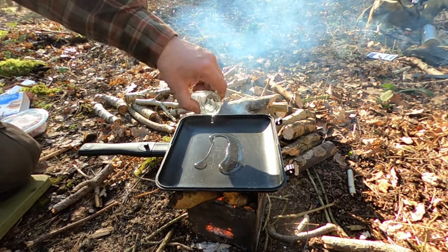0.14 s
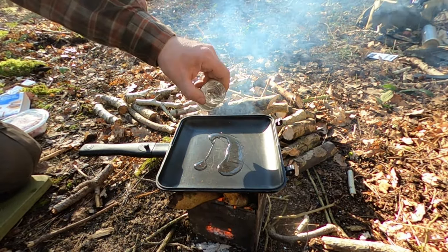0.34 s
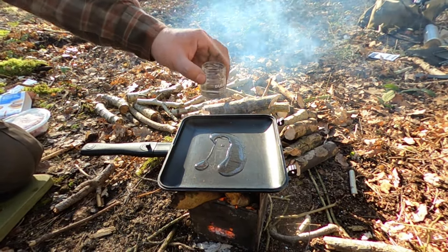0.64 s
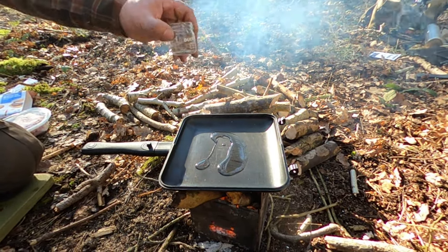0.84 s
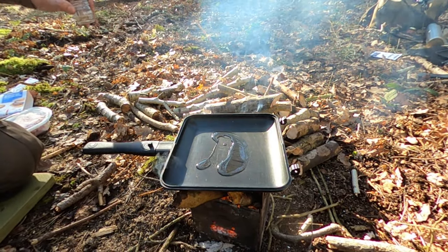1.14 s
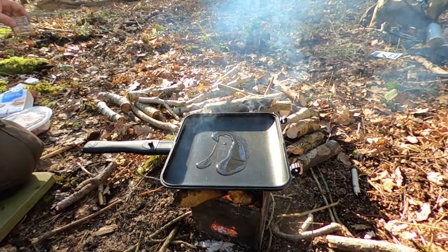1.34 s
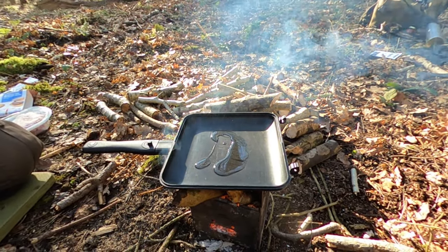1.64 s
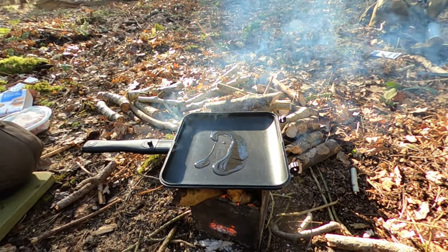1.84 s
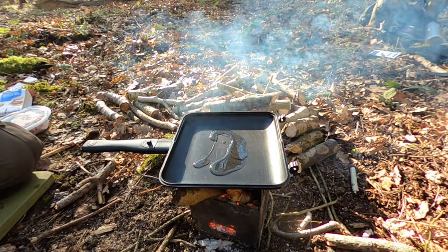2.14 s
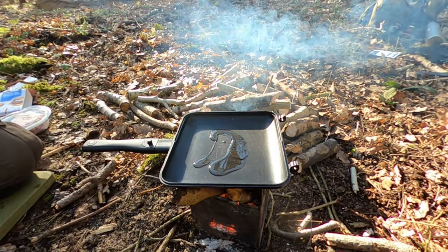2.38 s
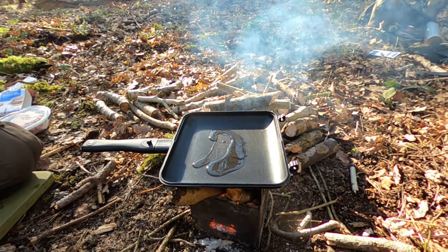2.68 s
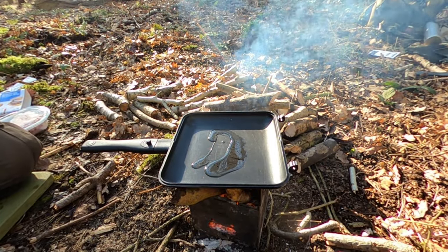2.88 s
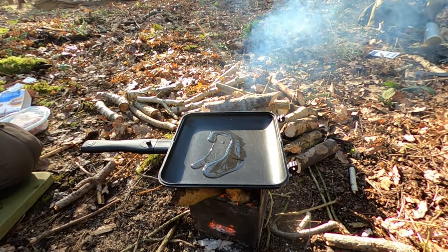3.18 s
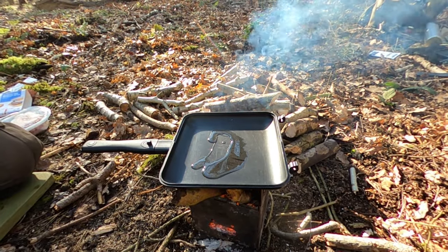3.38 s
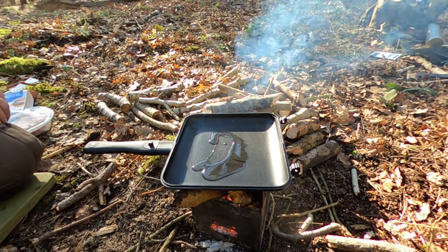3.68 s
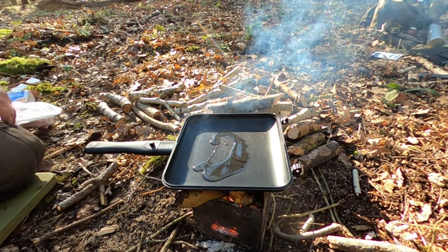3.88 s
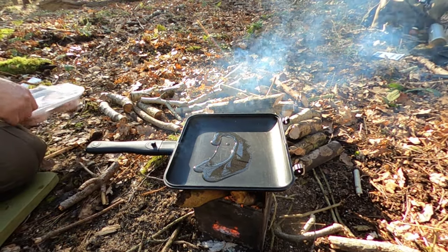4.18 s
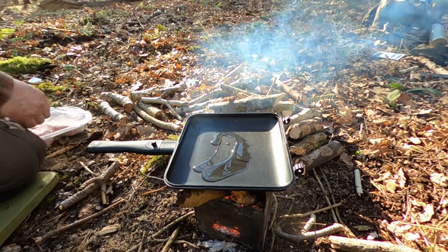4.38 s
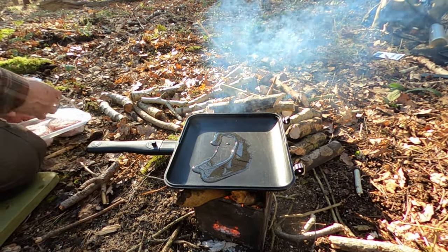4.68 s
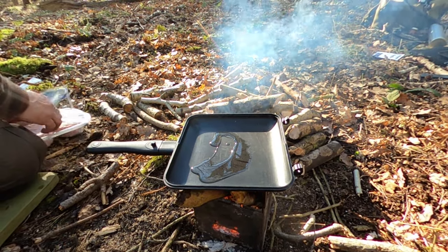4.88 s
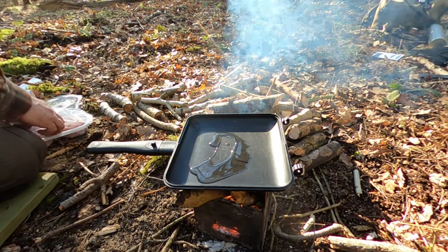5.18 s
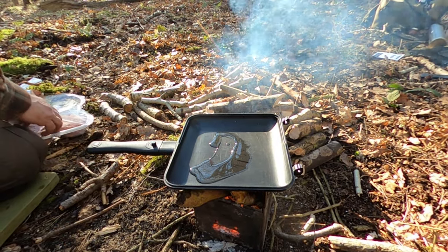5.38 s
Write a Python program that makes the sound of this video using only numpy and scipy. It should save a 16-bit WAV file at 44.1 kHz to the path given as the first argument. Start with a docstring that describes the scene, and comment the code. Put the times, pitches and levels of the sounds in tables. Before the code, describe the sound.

Outdoors in quiet woods, small birds chirp, whistle and warble with a soft forest echo. A wood fire's hiss swells gently with a few tiny pops, then fades. Later a hand rustles plastic wrapping over a tub, crinkling and snapping near the microphone, with a short hollow knock partway. Light wind rumbles low on the microphone, and a faint distant drone lies behind.

```python
"""Plastic wrapping is rustled over a food tub: creases and larger folds buckle, and its walls resonate.
The tub also knocks, as a cluster of contacts excites its decaying modes.
Small birds whistle in gliding, warbling tones, scattered by branches and by the far forest.
Behind them a wood fire hisses and pops as filtered noise, a breeze rumbles as low turbulent noise on
the microphone, dull thumps come through the ground, and a far drone and still air fill the background."""
import sys
import numpy as np
from scipy import signal
from scipy.fft import rfft, irfft
from scipy.io import wavfile
from scipy.ndimage import uniform_filter1d

SR = 44100
rng = np.random.default_rng(int(sys.argv[2]) if len(sys.argv) > 2 else 0)


def bounce(signal):
    """Save signal as a 16-bit WAV file at the path given by the first command-line argument."""
    frames = np.transpose(np.atleast_2d(signal))
    limited = np.clip(frames, -1, 1)
    pcm = np.round(limited * 32767).astype(np.int16)
    wavfile.write(sys.argv[1], SR, pcm)


N = 243431
TIME = np.arange(N) / SR  # s

# relative spectral density of creasing plastic: frequency_hz, density_db
PLASTIC = [(100, 6.5), (260, -1), (520, -6), (850, -1.5), (1100, -6), (1500, 1), (2200, -3.5), (3100, -1),
           (4400, -4), (6500, -10.5), (8200, -17), (10000, -25.5), (12500, -26.5), (16000, -34.5)]
# how hard the hand works the wrapping: time_s, relative_level_db
HANDLING = [(3.45, -77.5), (3.6, -68), (3.73, -64.5), (3.8, -66), (3.94, -76), (4.12, -68.5), (4.27, -66.5),
            (4.45, -61), (4.76, -58.5), (4.92, -60.5), (5.23, -78.5), (5.39, -76), (5.52, -85)]


def gain_of(db):
    """Level to amplitude: 20 dB is a factor of ten."""
    return 10 ** (np.asarray(db) / 20)


def evened(x):
    """Normalization of the mean power: scales to rms 1."""
    return x / np.sqrt(np.mean(x ** 2) + 1e-30)


def read(points, hz):
    """Spectral envelope: interpolates decibels on a log-frequency axis."""
    f, value = np.transpose(points)
    return np.interp(np.log(hz + 1), np.log(f), value)


def follow(rows, axis=1):
    """Slow envelope: one column of a curve, interpolated at every sample."""
    rows = np.asarray(rows)
    return np.interp(TIME, rows[:, 0], rows[:, axis])


def add(mix, s, sound):
    """Superposition: adds a sound at time s, in place."""
    part = mix[max(round(s * SR), 0):][:len(sound)]
    part += sound[:len(part)]


def noise(colour):
    """Spectral shaping of white noise, to rms 1."""
    spectrum = rfft(rng.standard_normal(N))
    hz = np.fft.rfftfreq(N, 1 / SR)
    return evened(irfft(spectrum * gain_of(read(colour, hz)), N))


def wander(hz):
    """Low-passed random fluctuation of rms 1, up to about hz."""
    f = np.fft.rfftfreq(N, 1 / SR)
    return evened(irfft(rfft(rng.standard_normal(N)) / (1 + (f / hz) ** 4), N))


def coloured(x, colour, size=2048):
    """Minimum-phase filter: causal, so a click rings only after it lands."""
    hz = abs(np.fft.fftfreq(size, 1 / SR))
    log_gain = np.log(gain_of(read(colour, hz)))
    # the Hilbert transform of the log gain gives the minimum phase
    ring = np.fft.ifft(np.exp(np.conj(signal.hilbert(log_gain)))).real
    return signal.fftconvolve(x, ring[:size // 2])[:len(x)]


def band(x, hz, kind, order=2):
    """Butterworth low-pass or high-pass: maximally flat in its passband."""
    sections = signal.butter(order, min(hz, SR / 2 - 1), kind, fs=SR, output="sos")
    return signal.sosfilt(sections, x)


def echoes(x, t60, rise):
    """Diffuse scattering: dense reflections swell over rise seconds and decay exponentially."""
    t = np.arange(SR) / SR
    tail = rng.standard_normal(SR) * gain_of(-60 * t / t60) * (1 - np.exp(-t / rise))
    return signal.fftconvolve(x, tail / np.linalg.norm(tail))[:N]


def air(level_db=-85):
    """Stationary broadband noise of still forest air."""
    # relative spectral density: frequency_hz, density_db
    air_colour = [(150, -7), (300, 0.5), (450, -1), (780, -6), (1080, -4), (1700, -15.5), (3000, -25.5),
                  (7000, -9.5), (9500, -25.5), (13000, -26), (16000, -30.5)]
    return gain_of(level_db) * noise(air_colour)


def drone(level_db=-76, waver_db=1.4):
    """Low-frequency noise of the distance, with a slow random amplitude modulation."""
    # relative spectral density: frequency_hz, density_db
    drone_colour = [(40, -16), (90, -13.5), (150, -3), (200, -4), (250, -15), (330, -22), (600, -46)]
    return gain_of(level_db + waver_db * wander(5.6)) * noise(drone_colour)


def breeze(level_db=-3.5, fine_db=-6, growth=1.0, lull_db=6, lull_waver_db=2.1):
    """Turbulent pressure on the microphone: strong gusts break into finer eddies."""
    # relative spectral density of the large eddies: frequency_hz, density_db
    buffet_colour = [(10, -3), (22, 3), (40, 2.5), (60, -6), (100, -26.5), (150, -28.5), (220, -37),
                     (320, -68.5), (600, -85)]
    # gusts: crest_s, half_length_s, relative_level_db
    gust_rows = [(1.388, 0.093, -48.5), (1.788, 0.079, -46.5), (2.95, 0.096, -44), (3.51, 0.14, -42.5),
                 (4.832, 0.16, -37.5), (5.014, 0.043, -37.5), (5.244, 0.13, -49)]
    # breeze between gusts: time_s, relative_level_db
    lull = [(0.0, -60), (0.32, -69), (1.7, -59), (2.27, -72), (3.4, -56), (4.04, -70.5), (4.98, -51),
            (5.52, -66)]
    eddies = noise(buffet_colour)
    eddies /= np.sqrt(uniform_filter1d(eddies ** 2, size=3000) + 0.064)  # the wind sets the strength
    fine = band(rng.standard_normal(N), 80, "high", order=4)
    fine = evened(band(fine, 115.3, "low", order=4))
    gusts = sum(gain_of(db) * np.exp(-((TIME - s) / half) ** 2) for s, half, db in gust_rows)
    between = gain_of(follow(lull) + lull_db + lull_waver_db * wander(7.5))
    wind = np.hypot(gusts, between)
    fine_share = gain_of(fine_db) * (wind / wind.max()) ** growth
    return gain_of(level_db) * wind * (eddies + fine_share * fine)


def thumps(cycles=0.83):
    """Heavily damped low oscillation through the ground: a couple of cycles, soon lost in the soil."""
    # thumps: centre_s, envelope_peak_db, pitch_hz
    thump_rows = [(2.984, -47.5, 70.6), (3.522, -38.5, 79)]
    out = np.zeros(N)
    for s, db, hz in thump_rows:
        turns = (TIME - s) * hz
        out += gain_of(db) * np.exp(-(turns / cycles) ** 2) * np.sin(2 * np.pi * turns)
    return out


def fire(waver_db=-2.03, pop_t60=0.023, spark_t60=0.021):
    """Jet noise and impulses: steam hisses from the wood, small pockets burst as pops and ticks."""
    # hiss strength before its random waver: time_s, level_db
    hiss_level = [(0, -83.5), (.2, -87), (.45, -81), (.65, -81.5), (.85, -75), (1.1, -75.5), (1.6, -75),
                  (1.95, -75), (2.2, -78.5), (2.45, -82), (2.75, -85.5), (3.1, -88.5), (3.45, -79),
                  (5.52, -88)]
    # relative spectral density of the hiss: frequency_hz, density_db
    hiss_colour = [(150, -6.5), (450, -0.5), (680, 0), (860, -4), (1080, 0.5), (2000, -3.5), (3000, -2.5),
                   (4400, -1), (7000, 0.5), (8200, -11), (9500, -16), (13000, -18), (16000, -29)]
    # soft pops: start_s, peak_db, pitch_hz
    pop_rows = [(1.698, -58.5, 1540), (1.807, -64.5, 1290), (1.88, -67, 1060), (1.963, -70, 1000),
                (2.039, -68, 800), (2.472, -65, 1060)]
    # thin ticks of sparks: start_s, peak_db
    spark_rows = [(2.247, -62), (2.258, -63), (2.765, -70)]
    out = gain_of(follow(hiss_level) + waver_db * wander(29)) * noise(hiss_colour)
    t = np.arange(SR // 10) / SR
    for s, db, hz in pop_rows:
        burst = rng.standard_normal(len(t)) * gain_of(-60 * t / pop_t60)
        pop = band(band(burst, hz * 1.15, "low", order=4), hz * 0.6, "high")
        add(out, s, gain_of(db) * pop / abs(pop).max())
    for s, db in spark_rows:
        burst = rng.standard_normal(len(t)) * gain_of(-60 * t / spark_t60)
        tick = band(band(burst, 6500, "high"), 7300, "low")
        add(out, s, gain_of(db) * tick / abs(tick).max())
    return out


def note(length, from_hz, to_hz, db, ease, warble_hz, swell_db,
         warble_rate_hz=170, flutter_rate_hz=60, flutter_db=2.8):
    """Frequency modulation: a warbling glide that levels off if ease exceeds 1; swell tilts its level."""
    u = np.linspace(0, 1, round(length * SR))  # progress through the note
    warble, flutter = (evened(band(rng.standard_normal(SR // 3), hz, "low"))[-len(u):]
                       for hz in (warble_rate_hz, flutter_rate_hz))
    glide = to_hz + (from_hz - to_hz) * (1 - u) ** ease
    pitch_hz = glide + warble_hz * warble
    whistle = evened(np.sin(2 * np.pi * np.cumsum(pitch_hz) / SR))
    loudness = gain_of(db + swell_db * (u - .5) + flutter_db * flutter)
    return loudness * signal.windows.tukey(len(u), .25) * whistle


def birds(direct_db=-6, branches_db=-5, forest_db=-4.0, count=3):
    """Multiple scattering of song from a few perches: branches smear it, far trunks carry it on."""
    # rising chirps, each sung twice: start_s, from_hz, to_hz, relative_level_db
    chirp_pairs = [(0.036, 4810, 6380, -62), (1.686, 4170, 6515, -60), (4.026, 4750, 6510, -60)]
    # thin whistles that mostly sink and level off: start_s, length_s, from_hz, to_hz, relative_level_db
    whistles = [(0.922, .2, 8850, 7900, -75.5), (1.073, 0.16, 7260, 7280, -72),
                (1.196, .19, 8750, 7590, -69), (1.467, 0.23, 8810, 6990, -69.5),
                (2.61, 0.18, 6524, 6020, -69.5), (2.935, 0.14, 6740, 6100, -72.5),
                (3.289, .175, 8700, 7520, -74.5), (3.528, 0.18, 8700, 7770, -72.5),
                (3.805, 0.15, 8570, 7640, -68), (5.366, 0.18, 9150, 7980, -73.5)]
    # quick, nearly straight slurs: start_s, length_s, from_hz, to_hz, relative_level_db, warble_hz
    slurs = [(0.009, 0.064, 5170, 3960, -70.5, 100), (0.175, 0.058, 5070, 3835, -68.5, 100),
             (0.492, .04, 5220, 4200, -83.5, 50), (1.343, 0.055, 7700, 7170, -65.5, 70),
             (1.525, 0.043, 7540, 6300, -68.5, 50), (1.687, .03, 7030, 5600, -61.5, 60),
             (1.845, .03, 6820, 5180, -61.5, 60), (1.99, 0.1, 5500, 7000, -73, 130),
             (2.065, 0.042, 7260, 5540, -66, 35), (2.144, .062, 6940, 3950, -68, 25),
             (2.24, 0.13, 3724, 7600, -68, 25.2), (2.365, 0.037, 7370, 6830, -73.5, 60),
             (2.584, 0.029, 4470, 6500, -72.5, 70), (3.176, 0.096, 5420, 3980, -70, 140),
             (3.388, .055, 5000, 3960, -67.5, 120)]
    # faint buzzy trills on one pitch: start_s, length_s, pitch_hz, relative_level_db
    trills = [(0, 0.034, 7500, -73.5), (.19, 0.16, 7460, -77.5), (0.568, 0.26, 7220, -77),
              (0.806, .12, 7000, -73.5), (1.537, .12, 4410, -78.5), (3.354, .04, 4870, -70)]
    chirp_s, chirp_step_s = .122, .177
    perches = np.zeros((count, N))
    for k, (s, *row) in enumerate(chirp_pairs):
        for start in (s, s + chirp_step_s):
            chirp = note(chirp_s, *row, ease=1.6, warble_hz=110, swell_db=-3.5, warble_rate_hz=220)
            add(perches[k % count], start, chirp)
    for k, (s, *row) in enumerate(whistles):
        add(perches[k % count], s, note(*row, ease=1.4, warble_hz=45, swell_db=5.5))
    for k, (s, *row, warble_hz) in enumerate(slurs):
        add(perches[k % count], s, note(*row, ease=1.05, warble_hz=warble_hz, swell_db=-3))
    for k, (s, length, hz, db) in enumerate(trills):
        add(perches[k % count], s, note(length, hz, hz, db, ease=1, warble_hz=160, swell_db=-5.5))
    out = np.zeros(N)
    for song in perches:
        out += gain_of(direct_db) * song
        out += gain_of(branches_db) * echoes(song, t60=.25, rise=0.0032)
        out += gain_of(forest_db) * echoes(song, t60=.76, rise=0.0098)
    return out


def knock(level_db=0, crack_db=-10, crack_t60=0.011):
    """Modal excitation: each contact cracks briefly and sets the hollow tub's modes ringing."""
    # contacts in a quick cluster: start_s, ring_peak_db
    blows = [(4.2549, -40), (4.2583, -27), (4.2605, -31)]
    # modes of the tub: frequency_hz, relative_level_db, t60_s
    modes = [(390, -11, 0.039), (550, -0.5, 0.02), (1050, -6, 0.027), (1405, 0, 0.024), (1663, -2.5, 0.034),
             (1890, -4, .02), (2410, -4, 0.019), (2770, -7, 0.022), (4000, -2, 0.011), (4455, -7.5, 0.025),
             (5130, -8, .012), (6060, -11, .012), (6920, 0, 0.0078), (7760, -10, 0.012)]
    out, t = np.zeros(N), np.arange(SR // 8) / SR
    ring = np.zeros(len(t))
    for k, (hz, db, t60) in enumerate(modes):
        ring += (-1) ** k * gain_of(db - 60 * t / t60) * np.sin(2 * np.pi * hz * t)
    ring /= abs(ring).max()
    for s, blow_db in blows:
        crack = coloured(rng.standard_normal(len(t)) * gain_of(-60 * t / crack_t60), PLASTIC)
        contact = ring + gain_of(crack_db) * crack / abs(crack).max()
        add(out, s, gain_of(blow_db + level_db) * contact)
    return out


def effort(arrive_s=0.059):
    """Amplitude envelope of the handling: silent until the hand arrives, with a brief rest."""
    pause_s, pause_half_s, pause_db = 4.8, 0.043, -11.5  # the hand rests between two pulls
    rest_db = pause_db * np.exp(-((TIME - pause_s) / pause_half_s) ** 2)
    arrival = np.clip((TIME - HANDLING[0][0]) / arrive_s, 0, 1)
    return gain_of(follow(HANDLING) + rest_db) * arrival


def ripple(colour, depth_db, count=40):
    """Random spectral variation: chance peaks and dips, as every fold has its own shape."""
    hz = np.geomspace(200, 16000, count)
    return np.transpose([hz, read(colour, hz) + depth_db * rng.standard_normal(count)])


def snap(s, db, bass_db, treble_db, length, lead_db=-14, lead_t60=0.088, rise=0.0005,
         ring_t60=0.15, ring_db=-17, tilt=0.84):
    """Buckling: a fold creeps, gives way in a burst of cracks of its own colour, then shivers briefly."""
    t = (np.arange(SR // 8) - SR // 40) / SR  # the fold gives way at t = 0
    after = np.maximum(t, 0)
    burst = gain_of(-60 * after / max(length, .002)) + gain_of(ring_db - 60 * after / ring_t60)
    creep = gain_of(lead_db - 60 * abs(t) / lead_t60)
    shape = (1 - np.exp(-after / rise)) * burst + creep
    unevenness = gain_of(3.1 * rng.standard_normal(len(t)))
    cracks = shape * rng.standard_normal(len(t)) * unevenness
    # spectral tilt of this fold: frequency_hz, change_db
    lean = [(200, -3), (900, min(tilt * bass_db, 9)), (2200, 1.5), (3500, 1.5), (8000, tilt * treble_db)]
    leaning = [(hz, density_db + read(lean, hz)) for hz, density_db in PLASTIC]
    sound = coloured(cracks, ripple(leaning, depth_db=3))
    peak = np.sqrt(uniform_filter1d(sound ** 2, size=130).max())  # highest short-time rms
    return s + t[0], gain_of(db) * sound / peak


def snaps(level_db=-9, small_db=7, small_spread_db=2, small_treble_db=3, small_s=0.028, count=24):
    """Sudden release of strain: large folds snap, small ones scatter with the effort of the hand."""
    # large folds: start_s, relative_peak_db, bass_db, treble_db, decay_s
    large_folds = [(3.513, -50, -21, -41, 0.017), (3.563, -49.5, -16, -25, 0.026),
                   (3.593, -45, -23, -26, 0.033), (3.634, -47, -31, -23, 0.022),
                   (3.754, -44.5, -4, -31, 0.016), (3.772, -44, -6, -30, 0.026),
                   (3.796, -46, -21, -23, 0.019), (3.833, -41.5, -17, -30, 0.023),
                   (3.844, -36.5, -27.5, -34.5, 0.029), (3.865, -42, -17, -28, 0.015),
                   (3.918, -43, -15, -24, 0.014), (4.11, -39.5, -9, -14.5, 0.0099),
                   (4.243, -37.5, -25, -22, 0.015), (4.321, -34.5, -24.5, -34.5, 0.026),
                   (4.358, -34.5, -24, -29, 0.022), (4.448, -39.5, -8, -26, 0.026),
                   (4.491, -48, -28, -33, 0.029), (4.527, -33, -24.5, -41.5, 0.04),
                   (4.561, -37, -17, -49, 0.056), (4.633, -37, -33, -43, 0.037),
                   (4.647, -34, -24, -29, 0.036), (4.673, -25.5, -27.5, -37, 0.012),
                   (4.726, -31.5, -31.5, -35.5, 0.054), (4.738, -34.5, -39, -35, 0.028),
                   (4.849, -32.5, -44, -45, 0.014), (4.872, -40.5, -11, -33, 0.064),
                   (4.887, -29, -61, -43, 0.039), (5.127, -59, -11, -20, 0.026),
                   (5.166, -41.5, -2, -35, 0.039), (5.212, -48.5, -27, -46, 0.038),
                   (5.242, -48, -24, -40, 0.03), (5.289, -45.5, -17, -45, 0.045),
                   (5.368, -44.5, -6, -27, 0.038), (5.398, -38, -18, -41, 0.03)]
    even_bass_db, even_treble_db = -22.5, -35.5  # reference values of the plain plastic colour
    large, small = np.zeros((2, N))
    for s, db, bass, treble, length in large_folds:
        add(large, *snap(s, db + level_db, bass - even_bass_db, treble - even_treble_db, length))
    slots, step = np.linspace(HANDLING[0][0], HANDLING[-1][0], count, endpoint=False, retstep=True)
    for s in slots:
        db = small_db + small_spread_db * rng.standard_normal()
        add(small, *snap(s + step * rng.random(), db, 0, small_treble_db, small_s))
    return large + effort() * small


def rustle(creases_per_s=750, spread_db=7.5, crease_t60=0.0094, rub=0.38, level_db=3,
           walls_db=-3, fizz_db=-18, count=30):
    """Random impulses exciting resonators: tiny creases buckle in clumps and ring the tub's walls."""
    # resonances of the tub under the wrapping: frequency_hz, width_hz, relative_level_db
    wall_modes = [(720, 43, -16.5), (1640, 66, -31), (2160, 40, -2), (2550, 43, 5), (3110, 170, -18),
                  (4020, 360, -6.5)]
    film, t = np.zeros(N), np.arange(SR // 80) / SR
    for _ in range(count):  # one crease shape per pass
        size_db = spread_db * np.minimum(rng.exponential(1, N), 3.5)
        size = gain_of(size_db) * rng.choice([-1, 1], N)
        happens = rng.random(N) < creases_per_s / count / SR
        crease = evened(rng.standard_normal(len(t)) * gain_of(-60 * t / crease_t60))
        film += signal.oaconvolve(size * happens, crease)[:N]
    film = evened(evened(coloured(film, PLASTIC)) + rub * noise(PLASTIC))
    film *= gain_of(1.5 * wander(45))  # clumps
    walls = np.zeros(N)
    for hz, width, db in wall_modes:
        walls += gain_of(db) * signal.lfilter(*signal.iirpeak(hz, hz / width, fs=SR), film)
    body = band(film, 10130, "low", order=6) + gain_of(walls_db) * walls
    fizz = evened(band(film, 10100, "high", order=4))
    return effort() * (gain_of(level_db) * body + gain_of(fizz_db) * fizz)


def scene():
    """Superposition of all sources; ground and trees faintly scatter the near ones, equal in both channels."""
    near = rustle() + snaps() + knock()
    scatter = gain_of(-15.0) * echoes(near, t60=0.47, rise=0.00083)
    background = air() + drone() + breeze() + thumps() + fire()
    mid = near + scatter + birds() + background
    return np.array([mid, mid])


def record(dry):
    """Band limiting: the recorder passes only what lies below its upper edge."""
    edge = signal.firwin(511, 15750, window=("kaiser", 9), fs=SR)  # cutoff in Hz
    return signal.oaconvolve(dry, edge[None], "same")


dry = scene()
out = record(dry)
bounce(out)
```